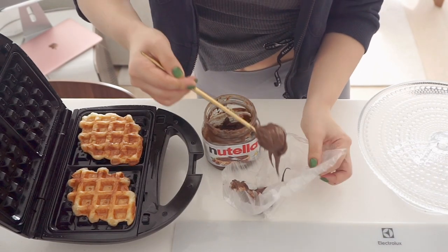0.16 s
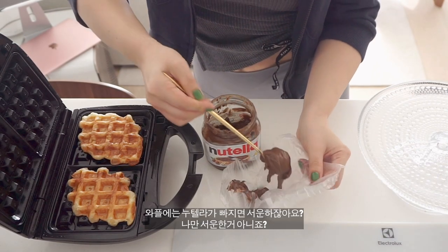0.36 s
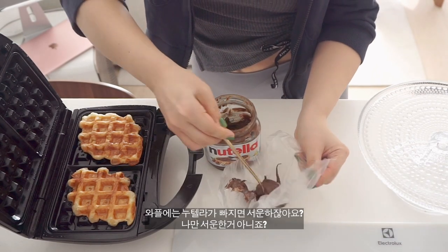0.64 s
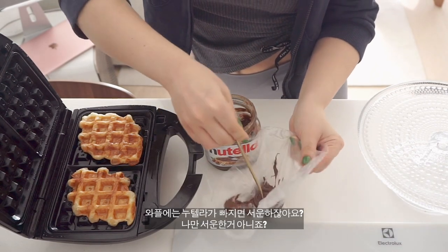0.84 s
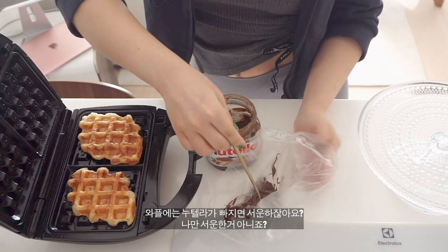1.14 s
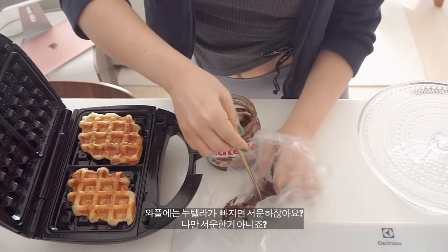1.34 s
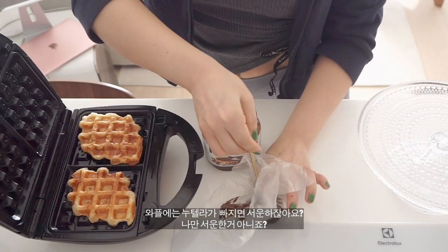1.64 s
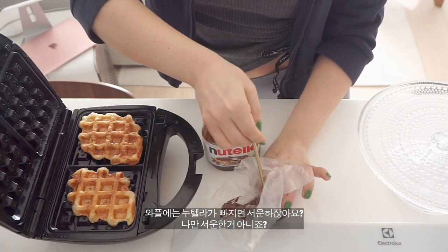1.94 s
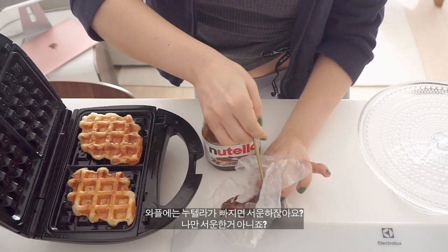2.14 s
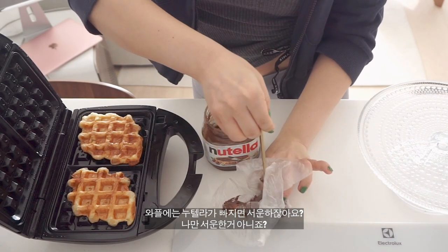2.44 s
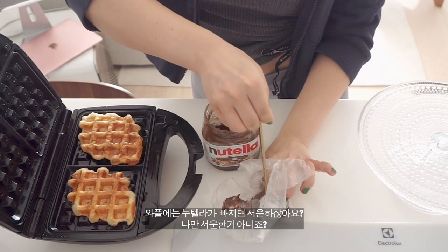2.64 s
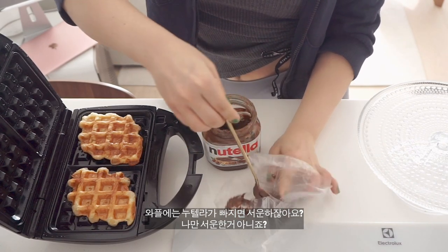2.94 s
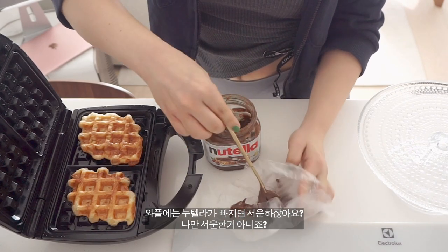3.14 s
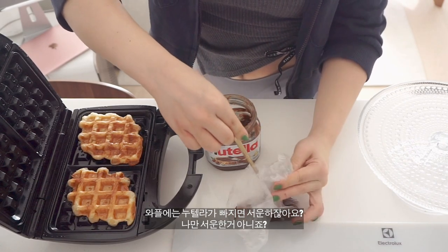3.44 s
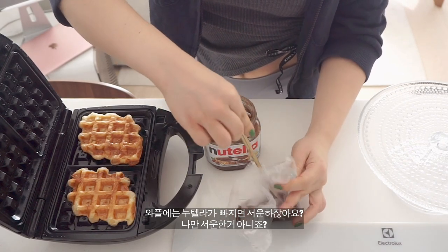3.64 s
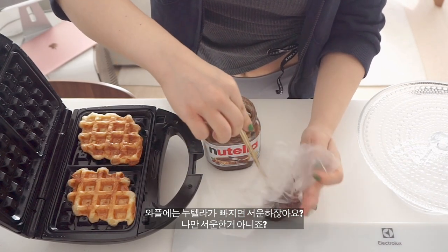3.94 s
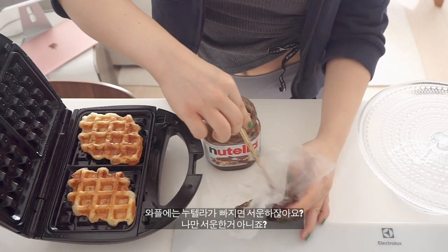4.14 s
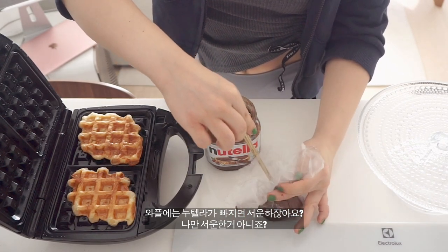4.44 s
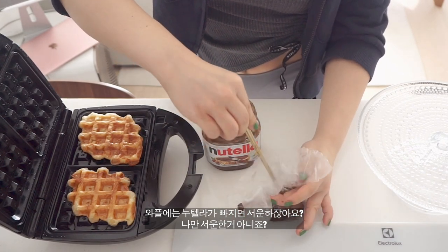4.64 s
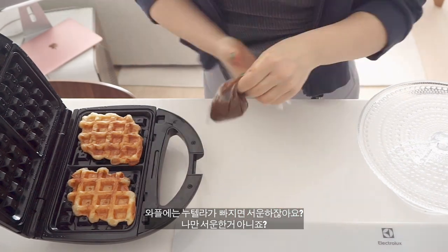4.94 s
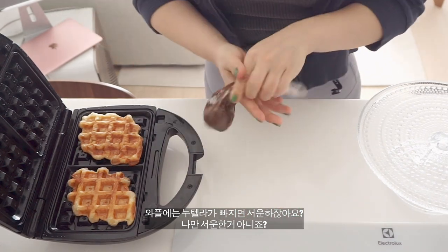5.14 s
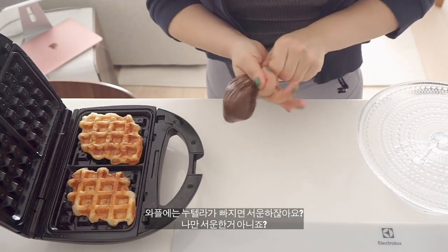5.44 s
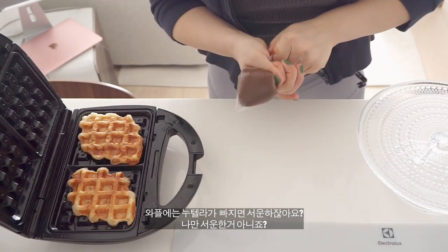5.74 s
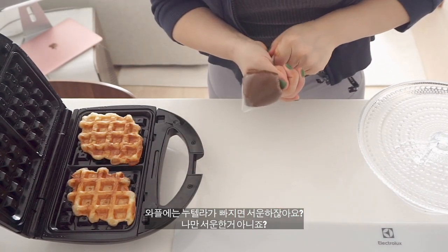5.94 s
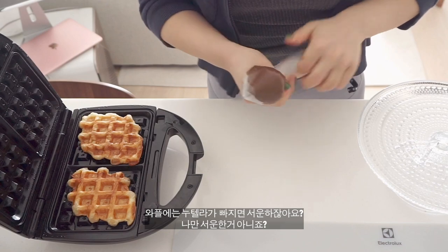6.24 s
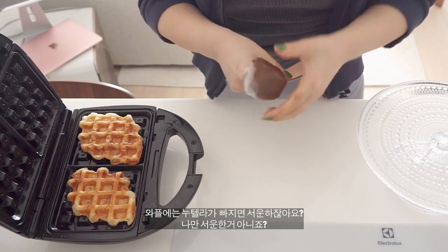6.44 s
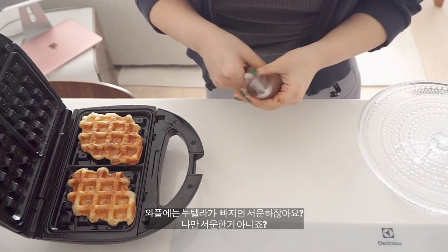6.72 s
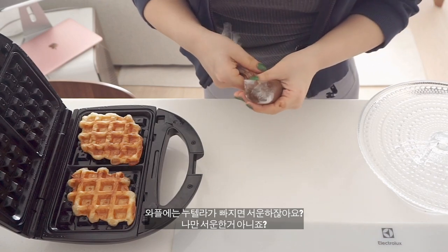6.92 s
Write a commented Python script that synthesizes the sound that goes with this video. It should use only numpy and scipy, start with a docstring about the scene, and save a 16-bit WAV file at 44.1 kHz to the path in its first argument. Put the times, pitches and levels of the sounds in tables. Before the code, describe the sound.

A quiet kitchen with very faint, steady room air. A thin plastic bag is handled close to the microphones, brighter and louder on the right, duller on the left, with a light diffuse room behind. From 0 to 0.3 s the rustle grows from little to crisp, dense crinkling, strongest around 0.5 to 1.4 s, with isolated crease pops. It eases to a soft stir near 2 s, amid small clicks, with a very faint dull bump at 2.5 s. Rustling swells again around 3 to 3.4 s, then continues gently; another faint bump comes near 4.2 s. Pops cluster at 4.5 to 4.7 s, then a sharp grab at 4.9 s is the loudest crackle. The bag is twisted: tighter, thinner, brighter crinkles, a strong pop at 5.2 s and a flurry of pops at 5.5 to 5.9 s. After 6 s, sparse small rustles and ticks remain until 7 s.

```python
"""In a small kitchen's still air a thin plastic bag is held open on the counter: its film rustles in tiny snaps.
From 0.3 s larger creases pop singly; as spread is filled in, the stick bumps softly near 2.5 s and 4.2 s.
From 4.9 s the bag is gathered and twisted shut: taut film snaps less often and its broad panels quieten.
The right microphone faces the bag, the left is shaded; a diffuse room answers under the direct sound.
Snaps are random impulses driving filtered noise, pops ring and crack, bumps are slow tones with puffs of noise."""
import sys
import numpy as np
from scipy import signal
from scipy.fft import rfft, irfft, next_fast_len
from scipy.io import wavfile

SR = 44100
rng = np.random.default_rng(int(sys.argv[2]) if len(sys.argv) > 2 else 0)


def wav_record(signal):
    """Record a signal, one row per channel, as 16-bit PCM in the file named by sys.argv[1]."""
    frames = np.transpose(np.atleast_2d(signal))
    bounded = np.clip(frames, -1, 1)
    # unit amplitude maps onto the largest positive 16-bit level
    quanta = np.round(bounded * 32767).astype(np.int16)
    wavfile.write(sys.argv[1], SR, quanta)


N = 312228

# still air of the kitchen, shape only: pitch_hz [Hz], level_db [dB per Hz]
AIR_SPECTRUM = [(25, -26), (70, -30), (150, -15.5), (300, -5), (600, 4), (2000, 0.5), (11000, -17.5)]
# direct sound at the shaded left microphone against the right: pitch_hz [Hz], level_db [dB]
LEFT_SHADOW = [(200, -1), (600, -4), (1100, -8.3), (2000, -9.3), (3600, -12), (6300, -19), (8300, -12.5),
               (11000, -11.5)]
# phase of the left microphone against the right: pitch_hz [Hz], lead_rad [radians ahead]
LEFT_LEAD = [(100, 0.61), (800, 1.06), (2000, 1.18), (3000, 0.54), (5000, 1.83), (6800, 0.71), (8300, 0.98),
             (11000, 0.27)]
# decay of the room's diffuse noise: pitch_hz [Hz], t60_s [s]
ROOM_DECAY = [(300, 1.7), (2000, 1.1), (10000, 0.2)]
# strength of the room's answer: pitch_hz [Hz], level_db [dB]
ROOM_LEVEL = [(300, -5), (1000, -11.5), (2000, -14.5), (5000, -10.5), (10000, -10)]

# colour of the film when open, shape only: pitch_hz [Hz], level_db [dB per Hz]
OPEN_FILM = [(150, -60), (250, -45), (302, -36), (366, -29), (526, -18), (901, -13), (976, -11.5),
             (1300, -8.5), (1840, -3), (2820, -5), (3570, -1), (4910, -8), (7170, -7), (10000, -2.5),
             (11000, -5), (14300, -58.5), (22000, -120)]
# colour of the film when twisted tight, shape only: pitch_hz [Hz], level_db [dB per Hz]
TIGHT_FILM = [(150, -58), (250, -31), (478, -31.5), (626, -22), (916, -26), (1220, -16), (1540, -18),
              (1870, -7.5), (2090, -5.5), (2910, -3.5), (3300, -3), (3990, 1.5), (5750, -6.5), (10300, -1),
              (11000, -2.5), (14300, -36), (22000, -120)]
# bands where broad panels of film sound: low_hz [Hz], high_hz [Hz]
PANEL_BANDS = [(345, 1400)]
# bands where folds sound: low_hz [Hz], high_hz [Hz]
FOLD_BANDS = [(1400, 2000), (2000, 2800)]
# bands where fine wrinkles sound, all cut at TOP_HZ: low_hz [Hz], high_hz [Hz]
WRINKLE_BANDS = [(2800, 4800), (4800, 7800), (7800, 16000)]
TOP_HZ = 11150  # band limit of the film, the cracks and the recorder

# pushes and grabs of the hands, before grip and overall strengths:
# height_s [s], level_db [dB, wrinkles], rise_s [s], fall_s [s], fold_db [dB, folds against wrinkles]
STROKES = [(0.072, -50, 0.045, 0.072, -12), (0.176, -44.5, 0.0081, 0.068, -9),
           (0.297, -40.5, 0.054, 0.047, -4.5), (0.495, -38, 0.049, 0.052, -6.5),
           (0.59, -38.0, 0.078, 0.022, -6), (0.799, -36.5, 0.29, 0.07, -6), (0.938, -38, 0.088, 0.072, -7),
           (1.262, -40.5, 0.051, 0.024, -6.5), (1.38, -40.5, 0.086, 0.25, -6.5),
           (1.552, -42.5, 0.15, 0.046, -6), (1.639, -47.5, 0.019, 0.17, -3.5),
           (1.763, -43, 0.04, 0.065, -4.5), (2.05, -52.5, 0.29, 0.21, -9.5),
           (2.087, -48.5, 0.025, 0.014, -4), (2.222, -45, 0.048, 0.06, -3), (2.27, -47, 0.009, 0.035, -3.5),
           (2.378, -53.0, 0.14, 0.21, -4.5), (2.745, -44.5, 0.13, 0.11, -2),
           (2.876, -42.5, 0.034, 0.13, -2.5), (3.163, -41, 0.033, 0.015, -2),
           (3.289, -38.5, 0.22, 0.095, -5.5), (3.555, -46, 0.23, 0.029, -5.0),
           (3.685, -42.0, 0.11, 0.24, -4.5), (3.91, -44, 0.35, 0.056, -8), (4.102, -43.0, 0.084, 0.3, -5.0),
           (4.18, -39, 0.02, 0.15, -10), (4.37, -45, 0.028, 0.243, -5.5), (4.44, -50.5, 0.038, 0.044, 0),
           (4.742, -44.5, 0.19, 0.23, -5.5), (4.868, -34.5, 0.025, 0.051, -4.0),
           (5.015, -44.0, 0.08, 0.048, -5.0), (5.221, -40, 0.18, 0.028, -4.5),
           (5.303, -42.0, 0.122, 0.026, -5), (5.402, -40.0, 0.088, 0.036, -5),
           (5.519, -43, 0.162, 0.099, -6.5), (5.65, -48, 0.07, 0.22, -12), (6.19, -48, 0.12, 0.039, -3.5),
           (6.358, -50.5, 0.049, 0.19, -5), (6.585, -56, 0.015, 0.043, 2), (6.641, -45.0, 0.067, 0.072, -7),
           (6.829, -50.5, 0.33, 0.22, -6), (6.914, -46.0, 0.034, 0.091, -8)]
STROKE_DROP_DB, STROKE_ROUND = 10, 1.374  # dB down one rise or fall time away; 1 = pointed, 2 = bell-shaped
GRIP_DB, GRIP_PER_S = 0.65, 40  # film catching and giving under the fingers: rms depth dB, knots a second
HELD_OPEN_DB, HELD_TIGHT_DB = (-58.5, -64.5), (-60.5, -75.5)  # stir of held film: (wrinkles, folds)
# gathering and twisting of the bag: start_s [s], tightness [0-1]
TWIST = [(4.9, 0), (5.2, .7), (5.7, 1)]

EASY_DB = -47  # level of easy handling
# at easy handling on open film; power of the amplitude; share left when tight
SNAPS_PER_S, SNAPS_GROW, TIGHT_SNAP_SHARE = 2100, 0.96, .6
# panels against wrinkles, (open, tight): dB at easy handling; dB lost per dB of harder handling
PANEL_DB, PANEL_LAG = (-15.5, -22), (0.05, 0.27)
WRINKLE_DB, FOLD_DB = -0.45, 0.55  # overall strength of the two finer sizes of crease

# single creases popping through; levels before the high-pass: start_s [s], level_db [dB, peak of the whole
# pop], pitch_hz [Hz], treble_db [dB, crack against the fold's smooth ring]
CREASE_POPS = [(0.3, -26, 3260, 12), (1.091, -37, 3200, 4), (0.927, -27, 2640, 5), (1.198, -28, 3000, 9),
               (1.6705, -28.5, 3460, -8), (1.854, -26, 1750, -13), (1.9046, -31.5, 3390, 36),
               (1.9797, -31, 3700, -7), (2.1183, -32, 3720, 2), (2.1614, -29.5, 3140, 8),
               (2.321, -35.5, 2030, -7), (2.3622, -30.5, 3440, -3), (2.649, -31, 3130, 0),
               (3.616, -30, 2500, 13), (4.5305, -25.5, 2590, -3.5), (4.591, -26, 2180, -12),
               (4.6333, -33, 2440, -8), (4.7205, -24, 2770, 4), (5.221, -17.5, 3820, -21),
               (5.5255, -22, 2860, 3.5), (5.5425, -31, 2820, -2), (5.5993, -29, 2830, 10),
               (5.6554, -25, 3530, 17), (5.6646, -24, 4250, 5), (5.689, -27, 4140, 6),
               (5.779, -32, 4200, 17), (5.8033, -35, 3710, 8.5), (5.8563, -33.5, 3600, 9),
               (5.9977, -39, 3350, 12), (6.047, -39, 3850, 18), (6.322, -37, 3270, 13),
               (6.5195, -32, 2440, -12), (6.5311, -33, 2350, -14), (6.5765, -31, 2540, -3),
               (6.6346, -26, 3630, 17), (6.688, -25.5, 4500, -15), (6.7966, -34, 2960, -3)]
# soft bumps of the stick through the bag: start_s [s], level_db [dB, swell peak before the high-pass], pitch_hz [Hz]
STICK_BUMPS = [(2.472, -65.5, 311), (4.174, -65, 321)]


def amp(db):
    """Decibels to gain."""
    return 10 ** (np.asarray(db) / 20)


def unit(x):
    """Scale to rms 1."""
    return x / np.sqrt(np.mean(x ** 2) + 1e-20)


def along(points, hz):
    """(Hz, value) points read on a log frequency axis."""
    f, v = np.transpose(points)
    return np.interp(np.log(hz + 1), np.log(f + 1), v)


def curves(rows):
    """One value per sample for each column after the time."""
    s, *cols = np.transpose(rows)
    return [np.interp(np.arange(N) / SR, s, c) for c in cols]


def wobble(rate):
    """A random curve of rms 1, rate knots a second."""
    knots = rng.standard_normal(int(N * rate / SR) + 2)
    return unit(np.interp(np.arange(N) * rate / SR, np.arange(len(knots)), knots))


def filtered(x, response):
    """x times a complex response of frequency."""
    size = next_fast_len(N + SR // 8, real=True)
    spectrum = rfft(x, size) * response(np.fft.rfftfreq(size, 1 / SR))
    return irfft(spectrum, size)[..., :N]


def below(hz, edge_hz, order):
    """Gain of a low-pass."""
    return 1 / np.sqrt(1 + (hz / edge_hz) ** (2 * order))


def above(hz, edge_hz, order):
    """Gain of the matching high-pass."""
    return np.sqrt(1 - below(hz, edge_hz, order=order) ** 2)


def bandpassed(x, low_hz, high_hz):
    """A gentle band-pass."""
    sos = signal.butter(2, [low_hz, high_hz], "bandpass", fs=SR, output="sos")
    return signal.sosfilt(sos, x)


def peak_one(x):
    """Scale to peak 1."""
    return x / np.abs(x).max()


def ringing(power, life_s):
    """Power smeared by an exponential decay."""
    keep = np.exp(-1 / (life_s * SR))
    return signal.lfilter([1 - keep], [1, -keep], power)


def kitchen_air():
    """Still air: steady noise of its own at each microphone, coloured by one spectrum."""
    noise = rng.standard_normal((2, N))
    return amp(-73.0) * unit(filtered(noise, lambda hz: amp(along(AIR_SPECTRUM, hz))))


def handling(tight):
    """Levels (dB) of wrinkles and folds: the strokes add in power to the stir of the held film."""
    t = np.arange(N) / SR
    wrinkles, folds = [amp(open_db + tight * (tight_db - open_db)) ** 2
                       for open_db, tight_db in zip(HELD_OPEN_DB, HELD_TIGHT_DB)]
    for height_s, level_db, rise_s, fall_s, fold_db in STROKES:
        near = slice(*np.searchsorted(t, [height_s - 1, height_s + 1]))
        side_s = np.where(t[near] < height_s, rise_s, fall_s)
        away = np.abs(t[near] - height_s) / side_s
        power = amp(level_db - STROKE_DROP_DB * away ** STROKE_ROUND) ** 2
        wrinkles[near] += power
        folds[near] += power * amp(fold_db) ** 2
    grip_db = GRIP_DB * wobble(GRIP_PER_S)
    return 10 * np.log10(wrinkles) + grip_db, 10 * np.log10(folds) + grip_db


def snaps(rate, spread_db, clump_db, clump_rate):
    """Random buckling instants of uneven size; their sizes swell and shrink together in small avalanches."""
    fired = rng.random(N) < rate / SR
    own_size_db = spread_db * np.minimum(rng.standard_normal(N), 2)
    clump_size_db = clump_db * np.minimum(wobble(clump_rate), 2)
    # dividing by the rate leaves loudness to the handling curves
    return unit(fired * amp(own_size_db + clump_size_db) / np.sqrt(rate))


def film(strikes, bands, tight, life_s, slide_db, slide_s=0.0061, own_db=2.0, flutter_db=1.39, flutter_rate=45):
    """Each snap is a brief flurry with a colour of its own, followed by the hiss of film sliding to rest."""
    size = next_fast_len(N + SR // 8, real=True)
    hz = np.fft.rfftfreq(size, 1 / SR)
    shaken = 0
    for low_hz, high_hz in bands:
        colour_db = own_db * np.minimum(rng.standard_normal(N), 1.5)
        power = unit(strikes * amp(colour_db)) ** 2
        flurry = ringing(power, life_s) + amp(slide_db) ** 2 * ringing(power, slide_s)
        flutter = amp(flutter_db * wobble(flutter_rate))  # creases of each size come and go
        drive = unit(np.sqrt(flurry) * flutter * rng.standard_normal(N))
        band_gain = above(hz, low_hz, order=5) * below(hz, high_hz, order=5) * (hz < TOP_HZ)
        shaken = shaken + rfft(drive, size) * band_gain
    open_voice, tight_voice = [unit(irfft(shaken * amp(along(spectrum, hz)), size)[:N])
                               for spectrum in (OPEN_FILM, TIGHT_FILM)]
    return (1 - tight) * open_voice + tight * tight_voice


def rustle():
    """Every snap shakes fine wrinkles, folds and broad panels; effort adds snaps, twisting stills the panels."""
    tight, = curves(TWIST)
    level_db, fold_db = handling(tight)
    effort_db = level_db - EASY_DB
    rate = SNAPS_PER_S * amp(SNAPS_GROW * effort_db) * TIGHT_SNAP_SHARE ** tight
    panel_offset_db = np.interp(tight, [0, 1], PANEL_DB)
    panel_lag = np.interp(tight, [0, 1], PANEL_LAG)
    panel_db = level_db + panel_offset_db - panel_lag * effort_db

    strikes = snaps(rate, spread_db=4.0, clump_db=1.12, clump_rate=200)
    panels = film(strikes, PANEL_BANDS, tight, life_s=0.0012, slide_db=-2)
    folds = film(strikes, FOLD_BANDS, tight, life_s=.0005, slide_db=-0.5)
    wrinkles = film(strikes, WRINKLE_BANDS, tight, life_s=0.00033, slide_db=-3.5)
    return amp(level_db + WRINKLE_DB) * wrinkles + amp(fold_db + FOLD_DB) * folds + amp(panel_db) * panels


def room(x, size=30000):
    """A short diffuse tail, different at each microphone and gliding as the bag moves."""
    wet, padded = np.zeros((2, N + 3 * SR)), np.pad(x, size)
    # overlapping pieces of sound each meet a fresh tail
    for start in range(0, N + size, size // 2):
        hz, t, z = signal.stft(rng.standard_normal((2, SR // 4)), SR, nperseg=256)
        decay = amp(-60 * t / along(ROOM_DECAY, hz)[:, None])
        tail = signal.istft(z * decay, SR, nperseg=256)[1]
        tail *= 1 + 2.4 * np.exp(-np.arange(tail.shape[1]) / SR / 0.017)  # the counter and things on it answer first
        tail /= np.linalg.norm(tail, axis=1, keepdims=True)
        piece = padded[start:start + size] * signal.windows.cosine(size)
        echo = signal.fftconvolve(piece[None], tail, axes=1)
        wet[:, start + SR // 700:][:, :echo.shape[1]] += echo  # about 1.4 ms behind the direct sound
    return filtered(wet[:, size:size + N], lambda hz: amp(along(ROOM_LEVEL, hz)))


def pops(cycles=1.0, crack_s=0.00051, rough=0.84, hollow_db=-17, hollow_s=0.019):
    """A crease flips: the fold rings raggedly under a bright crack, and the bag's hollow answers."""
    out, t = np.zeros(N + SR), np.arange(SR // 25) / SR
    for start_s, level_db, pitch_hz, treble_db in CREASE_POPS:
        ragged_noise, hollow_noise, crack_noise = rng.standard_normal((3, len(t)))
        burst = t * np.exp(-t / crack_s)
        age = t * pitch_hz / (cycles * amp(-.18 * treble_db))  # dull, wide folds ring for longer
        smooth = age * np.exp(1 - age) * np.sin(2 * np.pi * pitch_hz * t)
        ragged = rough * peak_one(bandpassed(ragged_noise * burst, pitch_hz / 2, pitch_hz * 1.51))
        hollow_band = peak_one(bandpassed(hollow_noise, pitch_hz / 1.7, pitch_hz * 1.3))
        hollow = amp(hollow_db) * hollow_band * np.exp(-t / hollow_s)
        crack = amp(treble_db) * peak_one(bandpassed(crack_noise * burst, 6600, TOP_HZ))
        pop = peak_one(smooth + ragged + hollow + crack)
        out[round(start_s * SR):][:len(t)] += amp(level_db) * pop
    return filtered(out[:N], lambda hz: above(hz, 1300, order=5))  # so small a patch radiates no bass


def bumps(t60=0.065, attack=0.014, thud_db=1):
    """The stick meets the counter through film and spread: a dull, slow knock with a soft puff."""
    tone, push, t = np.zeros(N + SR), np.zeros(N + SR), np.arange(SR // 5) / SR
    for start_s, level_db, pitch_hz in STICK_BUMPS:
        shape = amp(-60 * t / t60) * (1 - np.exp(-(t / attack) ** 2))
        swell = amp(level_db) * peak_one(shape)
        start = round(start_s * SR)
        tone[start:][:len(t)] += swell * np.sin(2 * np.pi * pitch_hz * t)
        push[start:][:len(t)] += swell
    puff = unit(filtered(rng.standard_normal(N), lambda hz: below(hz, 800, order=4)))
    knock = tone[:N] + amp(thud_db) * push[:N] * puff
    return filtered(knock, lambda hz: above(hz, 260, order=8))


def scene():
    """The bag in a quiet kitchen, its direct sound louder at the right microphone."""
    air = kitchen_air()
    bag = rustle() + pops() + bumps()
    left = filtered(bag, lambda hz: amp(along(LEFT_SHADOW, hz)) * np.exp(1j * along(LEFT_LEAD, hz)))
    return np.array([left, bag]) + room(bag) + air


def record(dry):
    """The recorder cuts off steeply above its band limit."""
    return filtered(dry, lambda hz: below(hz, TOP_HZ, order=90))


dry = scene()
out = record(dry)
wav_record(out)
```